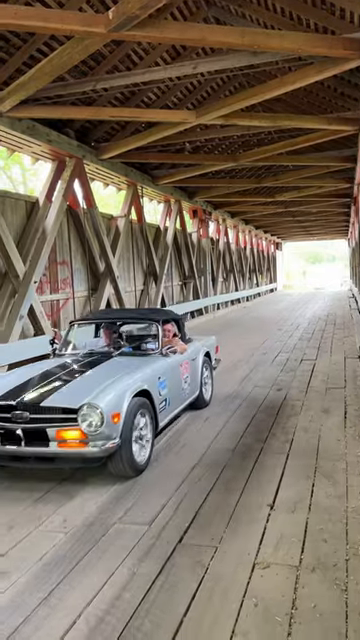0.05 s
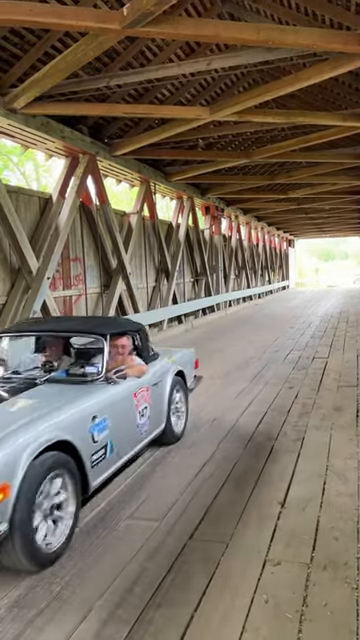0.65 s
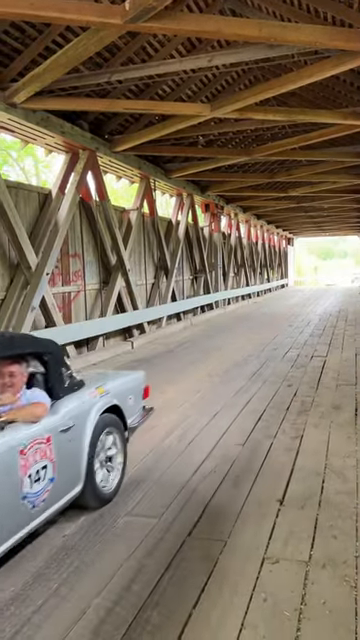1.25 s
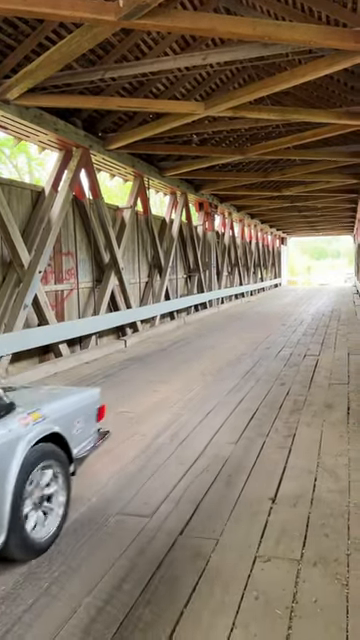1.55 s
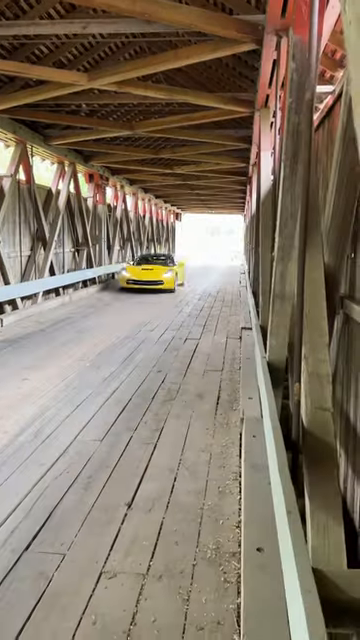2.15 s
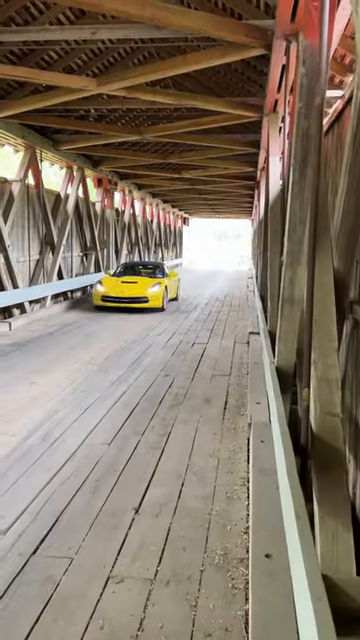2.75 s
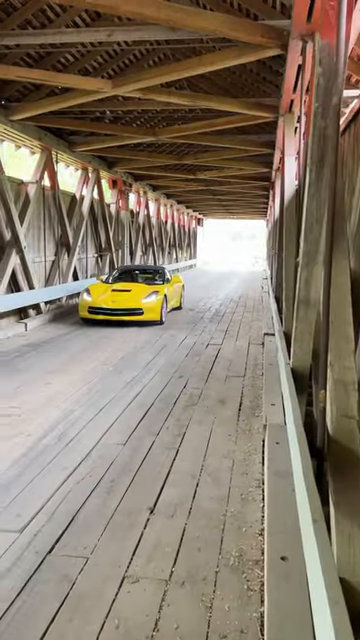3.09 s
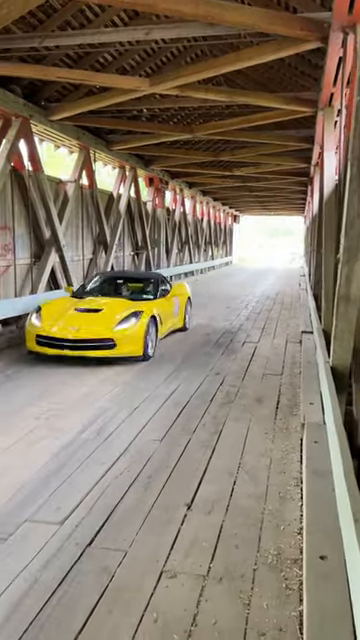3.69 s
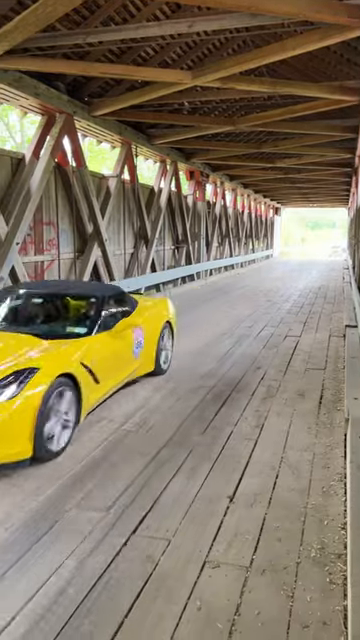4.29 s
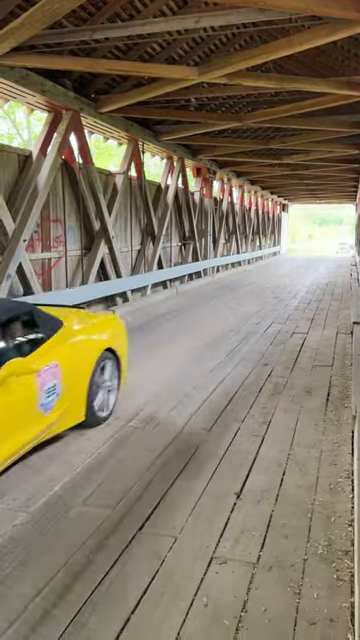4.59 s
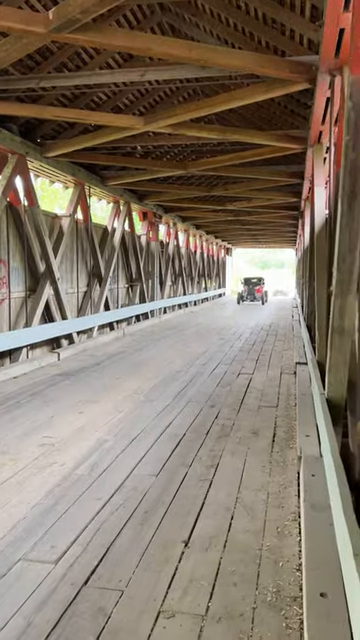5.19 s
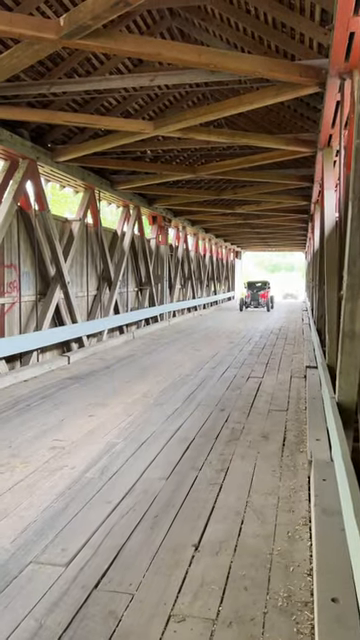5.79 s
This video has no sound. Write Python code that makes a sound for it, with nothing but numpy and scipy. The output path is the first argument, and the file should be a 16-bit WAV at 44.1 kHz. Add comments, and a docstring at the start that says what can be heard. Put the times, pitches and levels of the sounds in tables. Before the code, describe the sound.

Three cars in turn roll over a plank bridge with exhaust burble, tyre rumble and thumping boards, while a camera shutter snaps nearby.

```python
"""A six-cylinder roadster burbles past close by, over the plank deck of a covered wooden bridge.
The sound jumps abruptly to a quieter coupe rolling up on rumbling planks, then to an old car chugging
far away. Engines make stacks of tones, tyres roar and hiss, and loose boards ring under the wheels.
Nearby, the mirror and shutter of a reflex camera snap six times; a small bird chips outside."""
import sys
import numpy as np
from scipy import signal
from scipy.fft import rfft, irfft
from scipy.io import wavfile
from scipy.ndimage import uniform_filter1d

SR = 44100
rng = np.random.default_rng(int(sys.argv[2]) if len(sys.argv) > 2 else 0)


def inscribe(sig):
    """Save sig as 16-bit PCM at rate SR to the path in sys.argv[1].

    A 1-D sig is mono; a 2-D sig holds one channel per row.
    Samples are clipped to [-1, 1] before scaling.
    """
    pcm = np.round(np.clip(np.atleast_2d(sig).T, -1, 1) * 32767)
    wavfile.write(sys.argv[1], SR, pcm.astype(np.int16))


N = 266364
TIME = np.arange(N) / SR
BOOM_HZ, KNOCK_HZ = (35, 130), (170, 450)  # where the deck booms and where its planks knock

# Table levels are relative. An "order" is a tone at a multiple of an engine's speed.
# A "ring time" is how long a sound takes to fall by 60 dB.
# when each of the three cars starts, and when the last one ends: t/s
CAR_TIMES = [0, 2.0952, 4.942, 6.1]
# stereo width of the deck and tyre noise; above 12 kHz the sides carry far more than the middle: f/Hz, side
# against middle/dB
NOISE_WIDTH = [(60, -61), (200, -33), (380, -17), (600, -8.5), (1200, -15), (2200, -13), (4400, -1.5),
               (8000, -13), (11000, 3.5), (13000, 24)]
# a wheel drops on a loose plank: t/s, level/dB, extra boom/dB
PLANK_HITS = [(0.317, -26, 0), (1.839, -35, 0), (1.884, -23, 0), (2.06, -31, 0), (2.768, -22.5, 2),
              (3.25, -23, 1), (3.282, -16, 4), (3.317, -22, 4), (3.656, -17, 7), (3.685, -16, 2),
              (3.83, -19.5, 8), (4.257, -20, 7), (4.313, -19.5, 8), (4.439, -11, 3.5), (4.514, -15, 6),
              (4.591, -14.5, 2), (4.664, -15, 2), (4.898, -13.5, 7)]

# the roadster's engine speeds up, then sags as it passes: t/s, speed/(turns per s)
ROADSTER_REVS = [(0.0, 20.84), (0.12, 20.01), (0.24, 19.69), (0.38, 20.88), (0.52, 22.27), (0.7, 22.75),
                 (0.9, 23.33), (1.3, 23.37), (1.45, 22.9), (1.6, 21.59), (1.75, 20.55), (1.9, 18.8),
                 (2.1, 17.03)]
# its main exhaust note: t/s, level/dB
EXHAUST_NOTE = [(0, -15), (.3, -8), (.47, -25.5), (.6, -22.5), (.77, -16), (.98, -28.5), (1.12, -21),
                (1.3, -21), (1.52, -16), (1.73, -23.5), (1.89, -11), (2, -25), (2.07, -16)]
# its other orders swell as the tailpipe moves through standing waves under the roof; an echo dips them:
# order, level/dB, swing/dB, crest t/s, crest spacing/s, echo share (0-1), dip t/s
EXHAUST_ORDERS = [(2, -37.5, 7.0, 1.23, 1.7, 0.1, 1.09), (3, -19, 1, 0.28, 0.85, 0.24, 1),
                  (4, -25.0, 6.5, 1.76, 2.03, 0.2, 1.16), (5, -24.5, 4.5, 0.67, 1.3, 0.25, 1.175),
                  (7, -28, 7.5, 2.35, 5.8, 0.1, 1.05), (8, -32, 11, 1.07, 1.7, 0, 0.93),
                  (9, -29.0, 9.5, 0.33, 1.65, 0.37, 1.1), (10, -26.5, 5.0, 1.28, 2.0, 0.2, 1.06),
                  (11, -29, 6, 1.64, 1.97, 0.14, 0.81), (12, -24, 3.5, 0.88, 1.02, 0.36, 0.875),
                  (13, -34, 10, 1.3, 2.9, 0.02, 1.08), (14, -32, 6, 1.63, 2.5, 0.16, 1.1),
                  (15, -27.5, 2.0, 0.053, 0.7, 0.09, 1)]
# an order flares up for a moment: order, t/s, boost/dB
ORDER_FLARES = [(3, .32, 3), (9, .34, 8), (7, 1.35, 4), (12, 1.92, 1.5)]
# resonances of the tailpipe and the deck below it: f/Hz, level/dB
TAILPIPE = [(45.0, 4.5), (60.0, -7.5), (85.0, -4.0), (108.0, 5), (130.0, -3), (165.0, 0), (195.0, -6.5),
            (222.0, 2), (250.0, -11.5), (280.0, -6.5), (310.0, -6.5), (345.0, -7), (420.0, -9)]
# tone colour of the uneven firing: f/Hz, level/dB
BURBLE_COLOUR = [(50, -9), (80, -5.5), (105, 5), (130, -5), (175, 3.5), (215, -3), (250, -5.5), (300, -6.5),
                 (360, -9)]
# deck and tyre noise of the roadster: f/Hz, level/dB
ROADSTER_RUMBLE = [(20, -31), (35, -36), (55, -3), (110, -14.5), (220, -2.5), (320, -4), (420, -17),
                   (600, -18)]
ROADSTER_ROLL = [(260, -6), (450, 2), (620, -19.5), (760, -17), (910, -9.5), (1040, -9), (1130, -10.5),
                 (1760, -11.5), (3120, -6.5), (4440, -13.5), (4990, -15.5), (7100, -12), (11600, -24.5),
                 (12400, -44), (13000, -54), (15000, -90)]
# resonances of its engine bay: f/Hz, width/Hz, boost/dB
ENGINE_BAY = [(930, 66, 3), (1140, 40, 7), (2930, 400, 0), (3800, 270, 1), (4470, 220, 5)]
# its fuzzy whine: t/s, f/Hz, level/dB
ROADSTER_WHINE = [(0, 920, -49), (.45, 900, -42.5), (.8, 900, -56), (1.2, 930, -41), (1.3, 986, -47),
                  (1.45, 957, -59), (2.1, 898, -61)]

# each photo, timed by the mirror hitting its stop: t/s, level/dB
PHOTOS = [(0.134, -1), (0.3249, -1), (3.3819, -1), (3.768, 0), (3.958, 0), (4.14, 1)]
# strokes of mirror and shutter curtains: t/s from the mirror stop, level/dB, ring time/s
CAMERA_STROKES = [(-.0498, -18.5, 0.0071), (-.04, -33.5, 0.054), (-.033, -29, 0.017), (-.0236, -25.5, .016),
                  (-.0192, -23, 0.022), (-.0045, -29, 0.011), (0, -12, 0.0051), (.0035, -14.5, 0.0056),
                  (.0065, -20.5, 0.016), (.015, -35.5, 0.091), (0.0258, -30.5, 0.045), (0.0334, -19, 0.016),
                  (0.0375, -16.5, 0.008), (.0415, -17.5, .013), (0.0575, -23, .01)]
# the mirror's ringing tones: f/Hz, level/dB, ring time/s
MIRROR_TONES = [(4075, -1, 0.026), (5690, 12, 0.01), (7030, 6.5, 0.013), (8000, -5, 0.013)]
# knocks that set them ringing: t/s from the mirror stop, level/dB
MIRROR_KNOCKS = [(-.05, -24), (0, -17), (.0065, -29)]
# tone colour of the camera: f/Hz, level/dB
CAMERA_COLOUR = [(710, -9), (1200, 3), (1650, 1), (1880, -5), (2890, -6.5), (3280, -9), (4200, -2.5),
                 (5850, -6.5), (6240, -4.5), (6650, -4.5), (7650, -5.5), (8330, -10.5), (10900, -12),
                 (12900, -29.5), (15500, -37)]
# its stereo width: f/Hz, side against middle/dB
CAMERA_WIDTH = [(1200, -16), (2500, -1), (4500, 0), (6500, -11), (8500, -7), (11000, 2), (13000, 17)]
# a struck board's tones: f/Hz, level/dB, ring time/s
BOARD_TONES = [(68.5, 10, 0.16), (120.1, 3, 0.038), (240.3, 5.5, 0.17), (390, 5.5, 0.054), (448, 6.5, 0.18),
               (655, -2, 0.015), (1017, -4, 0.058)]

# deck boom, plank knock and tyre noise of the coupe: f/Hz, level/dB
COUPE_BOOM = [(20, -27), (35, -25), (50, -2), (75, 6), (120, 5), (150, 1.5), (200, -6.5)]
COUPE_KNOCK = [(90, -15), (150, -9.5), (200, -3), (250, -3), (290, -3.5), (350, -5), (450, -11.5),
               (650, -26.5)]
COUPE_ROLL = [(260, -29), (450, -5.5), (650, -2.5), (850, -4.5), (1100, -10.5), (1500, -17), (2400, -18),
              (3600, -22), (5000, -29), (6300, -28), (9000, -31.5), (11500, -36.5), (13000, -56),
              (15000, -76)]
# its engine: order, level/dB
COUPE_ENGINE = [(4, -12.5), (5, -9), (6, -6), (8, -22), (10, -2.5), (12, 4.5), (13, -14.5), (14, -7.5)]
# the deck hums under it, just below these pitches: t/s, f/Hz, level/dB
COUPE_DECK_HUM = [(2.1, 248, -44), (2.78, 248, -34.5), (3.1, 255, -43.5), (3.95, 266, -33),
                  (4.25, 256, -37.5), (4.45, 248.8, -27), (4.68, 246.4, -28), (4.85, 250, -35.5)]
# bird chips: t/s, f/Hz, level/dB
BIRD_CHIPS = [(2.18, 5100, -58), (2.22, 5150, -59), (2.47, 5100, -60), (2.515, 5100, -60),
              (2.76, 5200, -52), (2.885, 5200, -49)]
# fine grit under the tyres: f/Hz, level/dB
GRIT_COLOUR = [(3000, -22), (5000, -5), (6500, 1), (9000, -2), (11300, -9), (12400, -30), (14000, -55)]

# the old car's throttle opens twice: t/s, speed/(cycles per s), level/dB
OLD_THROTTLE = [(4.95, 20.9, -42), (5.1, 20.7, -40), (5.2, 20.6, -30), (5.3, 20.6, -27.5), (5.45, 21, -37),
                (5.65, 21.3, -30.5), (6.03, 21.2, -31)]
# its firing note and its higher hum: order, level/dB
OLD_FIRING = [(3, -7), (4, 4)]
OLD_OVERTONES = [(7.5, -3), (8, 2), (11.2, -3), (15.5, -9), (18.5, -6)]
# its deck and tyre noise: f/Hz, level/dB
OLD_RUMBLE = [(20, -21), (35, -27), (55, 3), (80, -7), (115, -8), (160, 2.5), (200, -9), (245, -2.5),
              (390, -6), (480, -18), (650, -22.5)]
OLD_ROLL = [(260, -23), (450, -1), (530, -4), (680, -1.5), (900, -8), (1200, -7.5), (1600, -16.5),
            (2200, -22.5), (3000, -22), (4000, -28.5), (5000, -35.5), (7200, -36), (10000, -44.5),
            (12000, -58), (13000, -78)]
# the ring of its engine: f/Hz, width/Hz, boost/dB
OLD_RING = [(1940, 110, 6)]


def amp(db):
    """Turns decibels into a gain."""
    return 10 ** (np.asarray(db) / 20)


def unit(x):
    """Scales a signal to an average size (rms) of 1."""
    return x / np.sqrt(np.mean(x ** 2) + 1e-20)


def curves(rows):
    """Joins the points of a time table into one curve for each column after the time."""
    times, *columns = np.transpose(rows)
    return [np.interp(TIME, times, column) for column in columns]


def colour(points, hz):
    """Reads the gain of a tone colour table at the given frequencies."""
    f, db = np.transpose(points)
    return amp(np.interp(np.log(hz + 1), np.log(f), db))


def add(mix, s, sound):
    """Lays a sound into the mix at s seconds."""
    part = mix[max(round(s * SR), 0):][:len(sound)]
    part += sound[:len(part)]


def wander(rate_hz, steps=8000):
    """A smooth random wobble of size 1; a higher rate makes it quicker."""
    hz = np.fft.rfftfreq(steps, TIME[-1] / steps)
    spectrum = rfft(rng.standard_normal(steps)) * np.exp(-(hz / rate_hz) ** 2)
    return np.interp(TIME, np.linspace(0, TIME[-1], steps), unit(irfft(spectrum, steps)))


def spread(pair, gain, width, lag_share):
    """Makes stereo from a direct and a scattered signal; part of the width is a left-right phase lag."""
    hz = np.fft.rfftfreq(N, 1 / SR)
    direct, scattered = rfft(pair) * gain
    side = colour(width, hz) * (-1j * lag_share * direct + np.sqrt(1 - lag_share ** 2) * scattered)
    return irfft(np.array([direct + side, direct - side]), N)


def band_noise(spectrum, level_db, band_hz, edges_hz=None, grain_db=0, resonances=()):
    """Coloured noise whose level inside the band follows level_db; grain makes it crackle."""
    hz = np.fft.rfftfreq(N, 1 / SR) + 1e-3
    gain = colour(spectrum, hz) / np.sqrt(1 + (hz / spectrum[-1][0]) ** 4)
    for centre, width, db in resonances:
        gain = gain * amp(db / (1 + (2 * (hz - centre) / width) ** 2))
    if edges_hz is not None:
        gain = gain / np.sqrt((1 + (edges_hz[0] / hz) ** 10) * (1 + (hz / edges_hz[1]) ** 10))
        ripple_db = .8 * unit(uniform_filter1d(rng.standard_normal(len(hz)), size=500))  # wall echoes
        gain = gain * amp(ripple_db)
    gain = gain / np.sqrt(np.mean(gain ** 2 * (hz > band_hz[0]) * (hz < band_hz[1])))
    noise = unit(rng.standard_normal((2, N)) * amp(grain_db * wander(340)))
    return spread(noise, gain, NOISE_WIDTH, lag_share=0.21) * amp(level_db)


def drone(hz, level_db, orders, rough, fade_db=1.0, blur=0.):
    """Tones at multiples of hz, unsteady from echoes; rough shakes their level and blur their pitch."""
    turns = np.cumsum(hz * (1 + blur * wander(70.5))) / SR
    tones = 0
    for order, db in orders:
        gain = amp(db + fade_db * wander(3.7)) * (1 + rough * wander(58))
        tones = tones + gain * np.cos(2 * np.pi * (order * turns + rng.random()))
    return amp(level_db) * unit(tones)


def passing(closest_s, speed_m_per_s, gap_m):
    """A car drives by: its level in dB against the closest point, and its pitch factor (Doppler)."""
    along_m = speed_m_per_s * (TIME - closest_s)
    distance_m = np.hypot(along_m, gap_m)
    doppler = 1 - speed_m_per_s * along_m / distance_m / 343  # sound travels 343 m/s
    return 20 * np.log10(gap_m / distance_m), doppler


def shaken(steady_db, jolt_db, boom_share=0, rise_s=0.013, settle_s=0.036):
    """A level in dB that swells at each plank hit, as the deck takes the wheel's load and settles."""
    power = amp(steady_db) ** 2
    for s, db, boom_db in PLANK_HITS:
        since = TIME - s
        swell = np.exp(-np.maximum(-since / rise_s, since / settle_s))
        power = power + amp(db + jolt_db + boom_share * boom_db) ** 2 * swell
    return 10 * np.log10(power)


def exhaust(beat_s=1.2, smear_turns=0.16, rough=0.059, throb=0.3, flare_s=.09, dip_every_s=.41):
    """Six cylinders give the main note; uneven firing burbles between the orders, thudding once a turn."""
    rate = curves(ROADSTER_REVS)[0]
    turns = np.cumsum(rate) / SR
    turns -= np.interp(beat_s, TIME, turns)  # one thud lands on beat_s

    def tone(order, unsteady, drift_turns=0):
        """One order, in step with the thud but smeared by echoes."""
        gain = np.sqrt(2) * (1 + unsteady * wander(21.3))
        phase = order * turns + smear_turns * rng.standard_normal() + drift_turns * wander(4)
        return gain * np.cos(2 * np.pi * phase)

    note = amp(curves(EXHAUST_NOTE)[0]) * tone(6, rough)
    for order, db, swing_db, crest_s, spacing_s, echo, dip_s in EXHAUST_ORDERS:
        level_db = db + swing_db * np.cos(2 * np.pi * (TIME - crest_s) / spacing_s)
        for flaring, s, boost_db in ORDER_FLARES:
            if flaring == order:
                level_db += boost_db * np.exp(-((TIME - s) / flare_s) ** 2)
        dips = abs(1 - echo * np.exp(2j * np.pi * (TIME - dip_s) / dip_every_s))
        note += amp(level_db) * dips * colour(TAILPIPE, order * rate) * tone(order, rough)
    burble = sum(colour(BURBLE_COLOUR, order * rate) * tone(order, unsteady=0.6, drift_turns=.25)
                 for order in np.arange(2.5, 16))
    thud = 1 + throb * np.cos(2 * np.pi * turns)
    return note + amp(shaken(steady_db=-36, jolt_db=-4)) * burble * thud


def tyres(spectrum, roar_db, hiss_db, grain_db, resonances=()):
    """Tread blocks roar on the boards; grit and air in the tread hiss."""
    roar = band_noise(spectrum, roar_db, (500, 1500), (430, 1750), grain_db, resonances)
    hiss = band_noise(spectrum, hiss_db, (2000, 12000), (1750, 15000), grain_db, resonances)
    return roar + hiss


def facing(db, until_s, fade_db_per_s):
    """Level of a sound from under the bonnet: steady while the nose points this way, then fading."""
    return db - fade_db_per_s * np.maximum(TIME - until_s, 0)


def roadster():
    """It rolls by slowly, so close that the rush of its engine bay, a hum and a whine come through."""
    near_db, doppler = passing(closest_s=0.9, speed_m_per_s=4.67, gap_m=3.03)
    deck = band_noise(ROADSTER_RUMBLE, shaken(steady_db=-27, jolt_db=-5), band_hz=(20, 600))
    rush = tyres(ROADSTER_ROLL, roar_db=-40 + 0.61 * near_db, hiss_db=-38 + 0.54 * near_db,
                 grain_db=0.66, resonances=ENGINE_BAY)
    turns = np.cumsum(curves(ROADSTER_REVS)[0]) / SR
    puffing = 1 + 0.046 * np.cos(2 * np.pi * turns)  # the rush pulses once a turn
    hum_db = facing(db=-40, until_s=0.47, fade_db_per_s=36)
    hum = drone(428.076 * doppler, hum_db, [(1, 0)], rough=0.1)
    tailpipe = exhaust()
    whine = drone(*curves(ROADSTER_WHINE), [(1, 0)], rough=.9, blur=.035)
    return tailpipe + deck + rush * puffing + hum + whine


def camera(rise_s=0.00092, echo_db=-29, echo_ring_s=0.24, alike=0.55, lead_s=.06):
    """Mirror and curtains snap in a set order, much alike in each photo; the timbers echo faintly."""
    t = np.arange(SR // 3) / SR
    power, snaps = np.zeros(len(t)), np.zeros((2, N))
    for delay, db, ring_s in CAMERA_STROKES:
        snap = (1 - np.exp(-t / rise_s)) * amp(3 - 60 * t / ring_s)
        echo = (1 - np.exp(-t / 0.0025)) * amp(echo_db - 60 * t / echo_ring_s)
        add(power, lead_s + delay, amp(db) ** 2 * (snap ** 2 + echo ** 2))
    shared_rattle = rng.standard_normal((2, len(t)))
    ring = sum(amp(db - 60 * t / ring_s) * np.sin(2 * np.pi * hz * t) for hz, db, ring_s in MIRROR_TONES)
    for s, db in PHOTOS:
        for delay, knock_db in MIRROR_KNOCKS:
            add(snaps[0], s + delay, amp(db + knock_db - 15) * ring)
        rattle = alike * shared_rattle + np.sqrt(1 - alike ** 2) * rng.standard_normal((2, len(t)))
        for channel, part in zip(snaps, rattle):
            add(channel, s - lead_s, amp(db) * np.sqrt(power) * part)
    hz = np.fft.rfftfreq(N, 1 / SR)
    body = colour(CAMERA_COLOUR, hz) * hz ** 2 / (hz ** 2 + 900 ** 2)  # thins out below 900 Hz
    return spread(snaps, unit(body), CAMERA_WIDTH, lag_share=0.85)


def loose_planks(detune=0.049):
    """Each wheel blow rings the low tones of a board, and every board is tuned a little differently."""
    t, out = np.arange(SR // 5) / SR, np.zeros(N)
    for s, db, _ in PLANK_HITS:
        ring = np.zeros(len(t))
        for hz, tone_db, ring_s in BOARD_TONES:
            pitch_hz = hz * (1 + detune * rng.standard_normal())
            ring += amp(tone_db - 60 * t / ring_s) * np.sin(2 * np.pi * pitch_hz * t)
        ring *= 1 - np.exp(-t / 0.0019)  # soft rubber takes a moment to load the board
        add(out, s, amp(db - 8.5) * ring / abs(ring).max())
    return out


def click(db=-8, decay_s=0.0018):
    """A sharp click as the roadster's sound breaks off."""
    since = np.maximum(TIME - CAR_TIMES[1], 0)
    return amp(db) * (since > 0) * np.exp(-since / decay_s)


def coupe(cycles_per_s=12.03):
    """A soft, steady engine under wide tyres that drum on the deck and grow louder as they near."""
    near_db, _ = passing(closest_s=4.55, speed_m_per_s=4.8, gap_m=4.46)
    boom_db = shaken(steady_db=-34 + 0.24 * near_db, jolt_db=-16.5, boom_share=0.96)
    knock_db = shaken(steady_db=-29.5 + 0.72 * near_db, jolt_db=-12.5)
    roar_db = shaken(steady_db=-33.5 + 1.12 * near_db, jolt_db=-20.5, boom_share=-1.2)
    deck = band_noise(COUPE_BOOM, boom_db, BOOM_HZ) + band_noise(COUPE_KNOCK, knock_db, KNOCK_HZ)
    rolling = tyres(COUPE_ROLL, roar_db, hiss_db=-43.5 + 1.15 * near_db, grain_db=0.44)
    fizz = grit(peak_db=-49, peak_s=4.79, swell_s=0.31)
    engine_db = facing(db=-27, until_s=3.2, fade_db_per_s=3.5)
    engine = drone(cycles_per_s, engine_db, COUPE_ENGINE, rough=0.16)
    tread = tread_note()
    deck_hum = drone(*curves(COUPE_DECK_HUM), [(0.99, 0)], rough=0.39)
    return deck + rolling + fizz + engine + tread + deck_hum


def bird(fall=0.039):
    """A small bird gives very short chips, each sliding down in pitch."""
    slide, out = np.linspace(-1, 1, SR // 60), np.zeros(N)
    for s, hz, db in BIRD_CHIPS:
        turns = np.cumsum(hz * (1 - fall * slide)) / SR
        chip = amp(db) * np.hanning(len(slide)) * np.sin(2 * np.pi * turns)
        add(out, s - len(chip) / 2 / SR, chip)
    return out


def grit(peak_db, peak_s, swell_s):
    """Tyres run through a patch of fine grit: a bright fizz that swells and fades."""
    level_db = peak_db - 20 * np.log10(1 + ((TIME - peak_s) / swell_s) ** 2)
    return band_noise(GRIT_COLOUR, level_db, band_hz=(5500, 11000), grain_db=2.0)


def tread_note(hz=660, fall=.025, peak_db=-33.5, peak_s=4.77, swell_s=.15):
    """The coupe's tread sings hoarsely for a moment as it goes by, falling in pitch."""
    progress = (TIME - peak_s) / swell_s
    swell = 1 / (1 + progress ** 4)
    pitch_hz = hz * (1 - fall * np.tanh(progress))
    return swell * drone(pitch_hz, peak_db, [(1, 0)], rough=.55, blur=.007)


def old_car(approach_db_per_s=3.0):
    """Four cylinders chug at the far end of the bridge and shake the deck; dull tyre noise slowly grows."""
    rate, engine_db = curves(OLD_THROTTLE)
    nearer_db = approach_db_per_s * np.maximum(TIME - CAR_TIMES[2], 0)
    rumble_db = -34.5 + 0.12 * (engine_db - engine_db[-1])
    deck = band_noise(OLD_RUMBLE, rumble_db, KNOCK_HZ)
    rolling = tyres(OLD_ROLL, roar_db=-44.5 + .5 * nearer_db, hiss_db=-53.5 + nearer_db,
                    grain_db=0.9, resonances=OLD_RING)
    fizz = grit(peak_db=-63.5, peak_s=5.39, swell_s=.08)
    firing = drone(rate, engine_db, OLD_FIRING, rough=.35, fade_db=.6)
    hum = drone(rate, -35, OLD_OVERTONES, rough=0.17)
    return deck + rolling + fizz + firing + hum


def scene():
    """Each car has its own stretch of time; click, planks, camera and bird are laid on top."""
    cars = 0
    for car, start, end in zip((roadster(), coupe(), old_car()), CAR_TIMES, CAR_TIMES[1:]):
        heard = uniform_filter1d(1. * ((TIME >= start) & (TIME < end)), size=130)  # 3 ms fades
        cars = cars + car * heard
    return cars + click() + loose_planks() + camera() + bird()


def record(dry):
    """Rounds off the loudest peaks, then removes the treble above 16200 Hz."""
    rounded = dry / (1 + (dry / .95) ** 8) ** (1 / 8)
    lowpass = signal.firwin(511, 16200, window=("kaiser", 9), fs=SR)
    return signal.oaconvolve(rounded, lowpass[None], "same")


dry = scene()
out = record(dry)
inscribe(out)
```